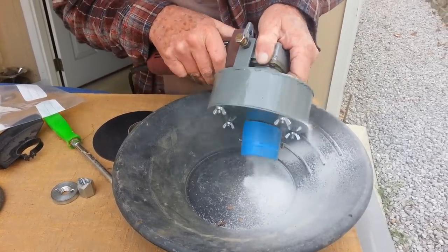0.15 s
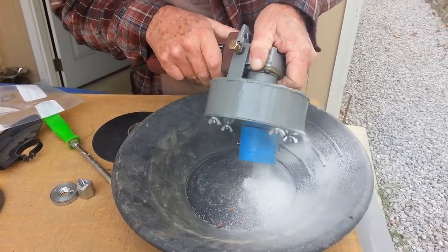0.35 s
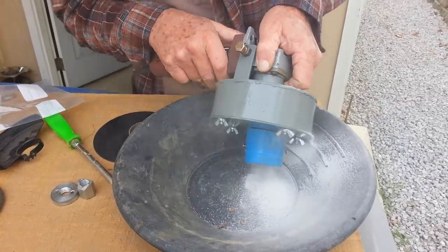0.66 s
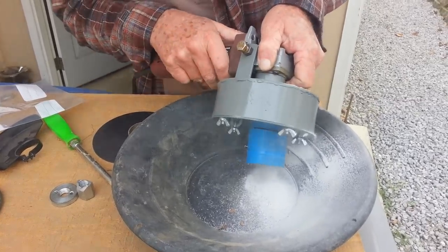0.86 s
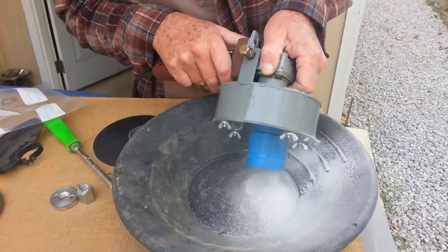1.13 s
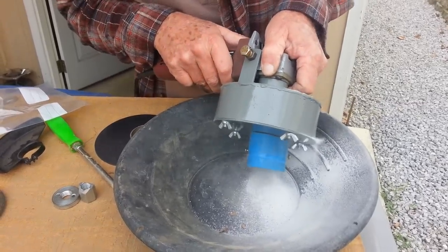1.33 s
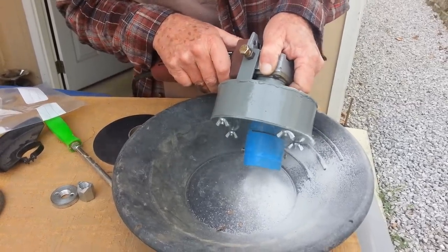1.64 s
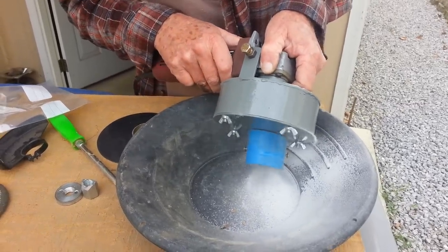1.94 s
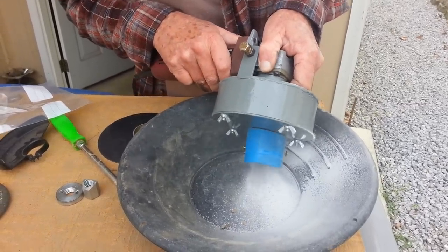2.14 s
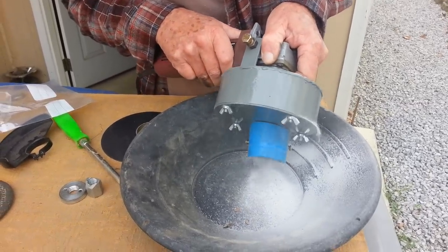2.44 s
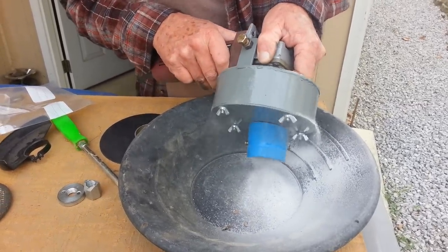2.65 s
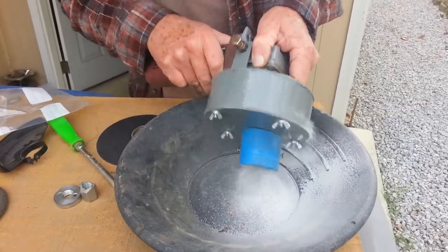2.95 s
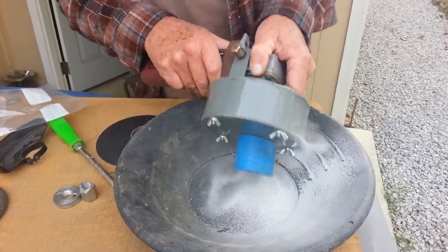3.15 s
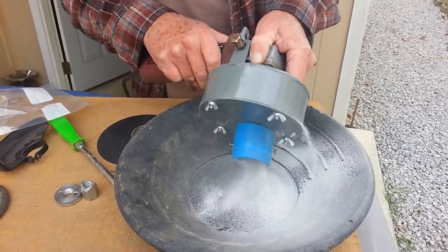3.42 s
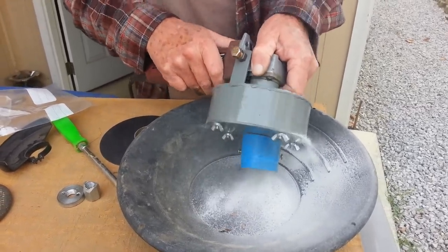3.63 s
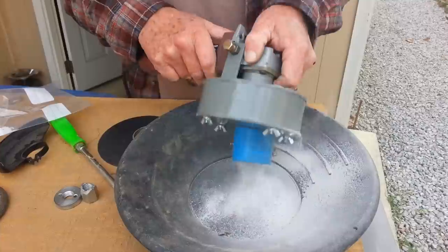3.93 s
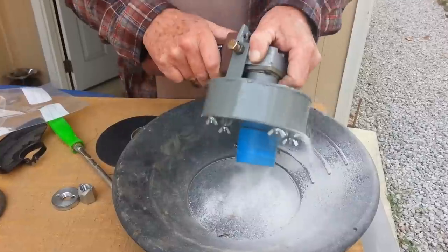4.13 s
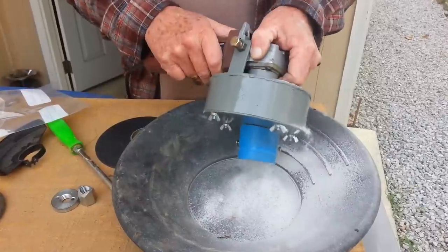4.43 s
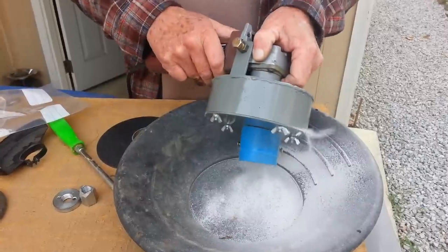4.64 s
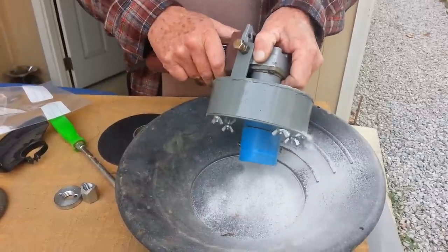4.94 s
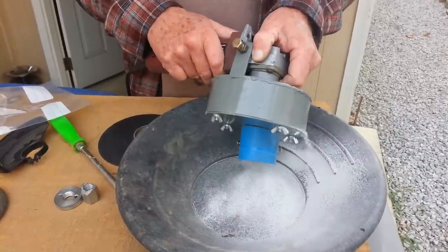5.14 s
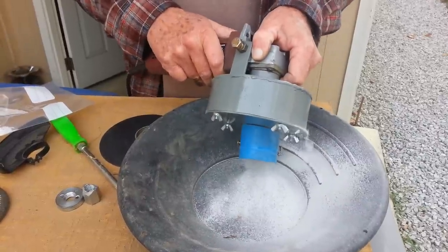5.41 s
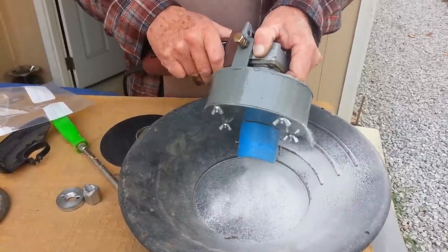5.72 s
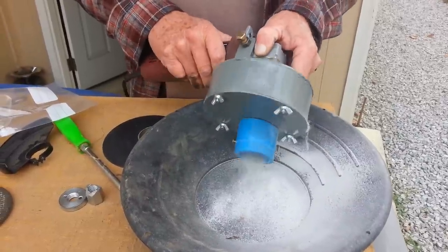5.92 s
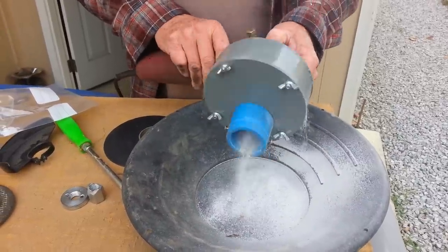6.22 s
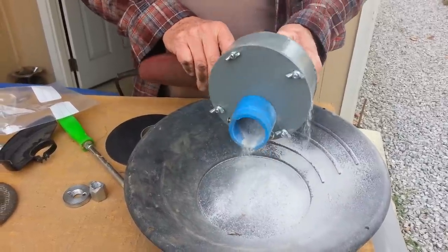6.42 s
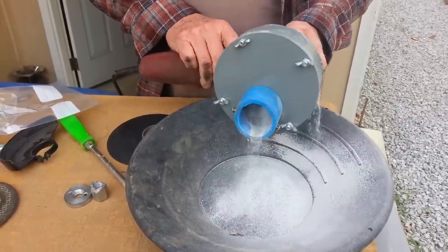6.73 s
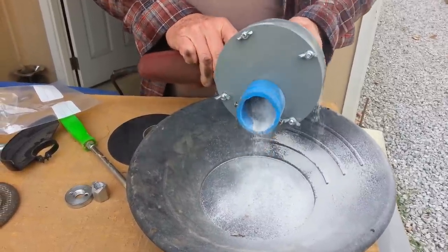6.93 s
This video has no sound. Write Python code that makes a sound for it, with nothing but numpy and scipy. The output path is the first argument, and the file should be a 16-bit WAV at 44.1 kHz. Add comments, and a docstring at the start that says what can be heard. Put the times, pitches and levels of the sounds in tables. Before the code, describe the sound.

A rock crusher drum roars close up, harsh steely grinding with rapid rattling fragments, sharp stone knocks and bright metallic pings, slightly overloaded.

```python
"""Stones smashed in a steel drum

An angle grinder whirls chains inside a closed steel drum, close to a camera, and smashes the stones in it.
Volleys of fragments, about 59 a second, shape noise filtered by the wall; bigger stones ring decaying modes.
Resonant noise howls in the spout, and low noise buffets the right microphone port; one jammed rock
shatters in a short roar. The camera's overloaded input rounds off the peaks."""
import sys
import numpy as np
from scipy import signal
from scipy.fft import rfft, irfft, next_fast_len
from scipy.io import wavfile
from scipy.ndimage import uniform_filter1d, map_coordinates

SR = 44100
rng = np.random.default_rng(int(sys.argv[2]) if len(sys.argv) > 2 else 0)


def makeup_ratio(level_db):
    """Linear amplitude ratio for a level in decibels (20 dB per factor of ten)."""
    decades = np.asarray(level_db, float) / 20
    return 10 ** decades


def bounce(signal):
    """Save signal as a 16-bit WAV file at the path given by the first command-line argument."""
    frames = np.transpose(np.atleast_2d(signal))
    limited = np.clip(frames, -1, 1)
    pcm = np.round(limited * 32767).astype(np.int16)
    wavfile.write(sys.argv[1], SR, pcm)


N = 311787


def unit(x):
    """Scaled to rms 1."""
    return x / np.sqrt(np.mean(x ** 2) + 1e-20)


def along(points, hz):
    """Interpolates (Hz, value) points on a log frequency axis."""
    f, v = np.transpose(points)
    return np.interp(np.log(hz + 1), np.log(f + 1), v)


def wobble(knots_per_s):
    """A smooth random curve through normal knots."""
    knots = rng.standard_normal(int(N * knots_per_s / SR) + 4)
    return map_coordinates(knots, [np.arange(N) * knots_per_s / SR])


def filtered(x, response):
    """x times a response of frequency."""
    m = next_fast_len(N + 8192)
    return irfft(rfft(x, m) * response(np.fft.rfftfreq(m, 1 / SR)), m)[..., :N]


def spikes(at_s, size):
    """Impulses of the given sizes at the given times."""
    return np.bincount(np.abs(at_s * SR).astype(int), size, N)[:N]


def resonance(hz, width_hz):
    """Response of one damped mode, 1 at its peak."""
    return lambda f: 1j * f * width_hz / (hz * hz - f * f + 1j * f * width_hz)


def pair(patchy_db):
    """Two partly alike noises for the two ports, with random gain patches in time and pitch."""
    # The two paths from drum to ports. Each row: frequency in Hz, likeness 0-1, right lead in rad.
    paths = [(200, 0.42, -0.5), (430, 0.59, 0), (790, 0.16, 0.45), (1340, 0.54, -0.5), (1700, 0.11, 0.2),
             (2130, 0.47, 0.54), (2800, 0.2, 0.3), (2840, 0.22, -3), (3580, 0.27, -1), (3940, 0.37, -4.5),
             (4360, 0.37, -2.5), (4700, 0, -11), (5250, 0.53, -5.5), (6000, 0.3, -8), (7200, 0.12, -9),
             (8200, 0.06, -10.5)]
    spectra = signal.stft(rng.standard_normal((2, N)), nperseg=256)[2]
    patches = rng.standard_normal(spectra.shape[1:])
    patches = uniform_filter1d(uniform_filter1d(patches, size=5, axis=0), size=4, axis=1)
    left, other = signal.istft(spectra * makeup_ratio(patchy_db * unit(patches)), nperseg=256)[1][:, :N]
    f, like, lead_rad = np.transpose(paths)
    shared = lambda hz: np.interp(hz, f, like)
    common = filtered(left, lambda hz: shared(hz) * np.exp(1j * np.interp(hz, f, lead_rad)))
    return np.array([left, common + filtered(other, lambda hz: np.sqrt(1 - shared(hz) ** 2))])


def ring(blows, modes, rattle_t60_s):
    """Each blow becomes a decaying noise burst that sets a group of damped sine modes ringing."""
    t = np.arange(SR // 8) / SR
    tone = sum(makeup_ratio(db - 60 * t / t60_s) * np.sin(2 * np.pi * hz * t) for hz, db, t60_s in modes)
    fade = makeup_ratio(-60 * t / rattle_t60_s)
    rattle = signal.fftconvolve(blows, fade / np.linalg.norm(fade))[:N] * rng.standard_normal(N)
    return signal.fftconvolve(rattle, tone)[:N]


def wind():
    """Lumpy low-frequency buffeting, nearly all on the exposed right port."""
    # Breeze spectrum. Each row: frequency in Hz, relative density in dB.
    breeze = [(20, -21), (45, 1), (100, 5), (200, 4), (400, -7.5), (900, -25)]
    # Gust course. Each row: time in seconds, relative level in dB.
    gusts = [(0, -27), (.08, -44), (.21, -33.5), (.37, -33), (.43, -55), (.5, -34.5), (1.71, -31),
             (1.81, -37), (2.42, -29.5), (2.89, -39.5), (3.11, -32), (3.21, -42), (3.3, -38), (3.37, -53),
             (3.43, -38.5), (4.35, -38), (4.43, -27), (4.5, -37.5), (5.14, -39), (5.7, -36), (7.07, -33)]
    rumble = filtered(rng.standard_normal((2, N)), lambda hz: makeup_ratio(along(breeze, hz)))
    lumpy = unit(rumble * makeup_ratio(1.75 * wobble(35)))
    quick_lulls_db = 5 * np.clip(wobble(14), 0, 3) ** 1.7
    gust_db = np.interp(np.arange(N) / SR, *np.transpose(gusts)) - quick_lulls_db
    return lumpy * makeup_ratio(gust_db + [[-17.74], [8.06]])


def spout(howl_db):
    """Air driven through drum and spout sings at their cavity resonance: noise through it twice."""
    cavity = resonance(hz=432, width_hz=75)
    air = unit(filtered(rng.standard_normal(N), lambda f: cavity(f) ** 2))
    return air * makeup_ratio(howl_db + 1.56 * wobble(8)) * makeup_ratio([[1.5], [-1.5]])


def jam():
    """A rock jams and shatters: a short noise roar, and the gain dip of the pause behind it."""
    # Shatter spectrum. Each row: frequency in Hz, relative density in dB.
    shatter = [(150, -23), (400, -1), (900, -8), (2000, -5), (4500, 0), (8000, -2.5), (12000, -10),
               (15000, -21)]
    at_s, before_fades_db, length_s = 1.611, 3, .027
    pause_s, pause_db = .018, -8
    t = np.arange(N) / SR - at_s
    attack, decay = np.clip(t / .0015, 0, 1), makeup_ratio(-250 * np.abs(t))
    release = np.clip((length_s - t) / .014 + .5, 0, 1)
    noise = unit(filtered(pair(patchy_db=2.0), lambda hz: makeup_ratio(along(shatter, hz))))
    hush = makeup_ratio(pause_db * np.exp(-((t - length_s - pause_s / 2) / pause_s * 2) ** 2))
    return makeup_ratio(before_fades_db) * attack * decay * release * noise, hush


def stones():
    """The biggest stones struck and a random scatter of smaller ones, in the same columns."""
    # Each row: time in seconds, then spray, low knock, wall ping and prior lull (or surge) in relative dB.
    biggest = [(0.3341, -11, -21, -6, -7), (0.3574, -12, -10, -5, -3), (0.5264, -12, -8.5, -17.5, 1),
               (0.5444, -20, -13, -27, -2), (1.1174, -13.5, -10, -16, -4), (1.8994, -17, -20, -13, -4),
               (1.9829, -13, -15, -12, -4), (2.1234, -10, -14, -15, -6), (2.6524, -6, -18, -11, -2),
               (3.045, -11, -13, -22, -1), (3.0574, -18, -5, -28, -4), (3.1094, -15, -9.5, -19, 1),
               (3.5774, -13, -18, -5, 0), (3.7434, -9, -9, -16, 0), (3.894, -9.5, -10, -12, -5),
               (3.9634, -9, -10.5, -20, -1), (4.2009, -10, -13, -8, -4), (4.5404, -10.5, -9, -14, -1),
               (4.5994, -15, -15, -19, -9), (5.0654, -7, -6, -19, -5), (5.1517, -12, -16, -19, -17),
               (5.1986, -11, -16, -16, -7), (5.2694, -17, -9, -15, 1), (5.3063, -8, -16, -9, -6),
               (5.444, -9, -10, -3, 0), (5.7518, -19, -18, -1, -7), (5.8624, -19, -27, -7, 0),
               (5.953, -18, -25, -12, 1), (5.9883, -19, -29, -2.5, -1), (6.088, -18, -29, -8, 0),
               (6.134, -21, -33, -24, -9), (6.3021, -18, -26, -5.5, -2), (6.3494, -18, -27, -11, -2),
               (6.4373, -21, -29, -14, -7), (6.455, -24, -28, -7, 2), (6.6424, -15, -29, -5, -1),
               (6.7087, -11, -13, -5, -9), (6.9944, -12, -12, -20, -4)]
    pebbles_per_s = 3
    pebble_db, spread_db = (-23, -25.5, -23, -1.5), (2.1, 4.8, 3, 1.2)  # spray, knock, ping, lull
    draw = rng.standard_normal((round(pebbles_per_s * N / SR), 4))
    at_s = rng.uniform(.03, N / SR - .03, len(draw))
    return np.vstack([biggest, np.c_[at_s, pebble_db + draw * spread_db]])


def volleys(per_s, scatter, fall_30db_s):
    """Times of the fragment volleys, and the power curve they leave: a quick rise and decay for each."""
    count = int(N / SR * per_s) + 40
    at_s = np.cumsum(1 + scatter * rng.standard_normal(count)) / per_s
    t = np.arange(SR // 8) / SR
    shape = makeup_ratio(-60 * t / fall_30db_s) * (1 - np.exp(-t / 0.00035))  # of power
    return at_s, np.abs(signal.fftconvolve(spikes(at_s, np.ones(count)), shape)[:N])


def singing(pelting):
    """The pelting filtered by each wall mode; each drifts, swells or sags once and changes as the drum tips."""
    # Wall modes kept singing by the grit. Each row: frequency and width in Hz, left and right relative dB.
    wall = [(4240, 230, -18.5, -35), (4680, 130, -16.5, -27), (6650, 160, -17, -21), (7750, 380, -36, -12),
            (8720, 360, -32, -16), (9280, 390, -18, -18)]
    # Each mode's course. Each row: drift in dB per s, swell time and length in s, swell in dB, tipped change in dB.
    swell = [(-3, 4.1, .6, 10, 1.5), (0, 6.2, 0.82, 7, -11), (0.8, 6, 1.2, -14, 8),
             (1.5, 6.2, .7, -7, -1.5), (-0.7, 6.3, .5, 5, -3), (1.5, 2.1, .8, 7.5, -2.5)]
    tip_from_s, tip_s = 6.24, .6  # the drum is tipped up to face the camera
    t = np.arange(N) / SR
    tipped = np.clip((t - tip_from_s) / tip_s, 0, 1)
    out = 0
    for (hz, width_hz, *side_db), (drift, at_s, length_s, swell_db, tip_db) in zip(wall, swell):
        mode = unit(filtered(pelting, resonance(hz, width_hz)))
        swelling_db = swell_db * np.exp(-((t - at_s) / length_s) ** 2)
        slow_db = drift * (t - t.mean()) + swelling_db + tip_db * tipped
        swing_db = slow_db + 3 * wobble(30) - 3.5  # each mode flutters on its own
        out = out + mode * makeup_ratio(swing_db + np.array(side_db)[:, None])
    return out


def drum(work_db):
    """Fragments pelt the wall in volleys over a steady churn; stones spray a shower and ring the steel."""
    # Pelted steel as each port hears it. Each row: frequency in Hz, relative density in dB.
    left = [(120, -44), (300, -8.5), (600, -13.5), (900, -15), (1400, -11.5), (2100, -11.5), (2800, -11.5),
            (3300, -6.5), (4200, -2.5), (5500, -7), (6600, -5.5), (7500, -6.5), (8400, -17), (9500, -8.5),
            (11200, -12), (12400, -12), (13500, -11), (14300, -22.5)]
    right = [(120, -35), (300, -8.5), (600, -11.5), (900, -14.5), (1500, -10.5), (2600, -8), (4000, -8.5),
             (5600, -7.5), (6800, -5.5), (7700, -2), (8300, -5.5), (9300, -4.5), (10200, -9), (11000, -9.5),
             (12000, -7), (13500, -12.5), (14300, -23.5)]
    # Lid modes, then wall modes. Each row: frequency in Hz, relative level in dB, t60 in seconds.
    knock_modes = [(1320, -14.5, 0.0069), (1614, -6.5, 0.01), (2106, -1.5, 0.021), (2430, -5.5, 0.0089),
                   (3260, -6.5, 0.013)]
    ping_modes = [(4710, -1, 0.035), (4280, -11, 0.017), (7200, -16, .025), (8950, -7, .015)]
    volley_s, power = volleys(per_s=59, scatter=.3, fall_30db_s=0.076)
    supply = uniform_filter1d(power, size=2600)  # crowded volleys share the fragments
    busy = np.sqrt(0.21 + power / supply * 0.79) * makeup_ratio(work_db + 0.5 * wobble(14))

    t = np.arange(SR // 8) / SR
    before = np.hanning(round(0.011 * SR))
    struck = stones()
    for at_s, spray_db, _, _, lull_db in struck:
        i = round(at_s * SR)
        busy[i - len(before) + len(before) // 4:][:len(before)] *= makeup_ratio(lull_db * before)
        spray = (makeup_ratio(spray_db - 60 * t / 0.044) * (1 - np.exp(-t / 0.00095)))[:N - i]
        busy[i:][:len(t)] = np.hypot(busy[i:][:len(t)], spray)

    grit = makeup_ratio(2.6 * uniform_filter1d(rng.standard_normal(N), size=9))  # single chips stand out a little
    pelting = pair(patchy_db=1.5) * busy * grit
    colour = lambda hz: makeup_ratio(np.array([along(left, hz), along(right, hz)]))
    steel = unit(filtered(pelting, colour)) + singing(pelting)
    steel = steel * np.sqrt(np.mean(pelting ** 2)) * makeup_ratio(-1.25)

    at_s, _, knock_db, ping_db, _ = struck.T
    chance = rng.standard_normal((len(volley_s), 2))  # each volley rings the steel by chance
    knocks = spikes(at_s, makeup_ratio(knock_db)) + makeup_ratio(-27.5) * spikes(volley_s, chance[:, 0])
    pings = spikes(at_s, makeup_ratio(ping_db)) + makeup_ratio(-24) * spikes(volley_s, chance[:, 1])
    knock = ring(knocks, knock_modes, rattle_t60_s=0.055) * makeup_ratio([[.6], [-.6]])
    ping = ring(pings, ping_modes, rattle_t60_s=0.021) * makeup_ratio([[2.5], [-2.5]])
    return steel + knock + ping


def scene():
    """Drum, spout, shattering rock and wind at the two ports."""
    # Grinding course. Each row: time in seconds, relative level in dB.
    work = [(0, -8), (.1, -10), (1.6, -10), (3, -10.5), (4.9, -10.5), (5.05, -10.5), (5.87, -10.5),
            (6.5, -11), (7.07, -11)]
    # Spout howl course. Each row: time in seconds, relative level in dB.
    howl = [(0, -28.5), (.27, -37), (.33, -26.5), (.61, -41), (.87, -31), (1.04, -37), (1.6, -32.5),
            (1.8, -36), (2.83, -35.5), (2.91, -28), (3.09, -34.5), (4.4, -31), (5.26, -32), (5.95, -32),
            (6.04, -50), (6.1, -31.5), (6.32, -39), (6.48, -29.5), (7.07, -32)]
    work_db, howl_db = [np.interp(np.arange(N) / SR, *np.transpose(rows)) for rows in (work, howl)]
    roar, hush = jam()
    return (drum(work_db) + spout(howl_db)) * hush + roar + wind()


def roll_off(x):
    """The treble ends steeply here."""
    return signal.sosfilt(signal.butter(12, 14550, fs=SR, output="sos"), x)


def record(dry):
    """The left port has a narrow dip at one pitch; the overloaded input rounds off the peaks."""
    dip_hz, width_hz, depth_db = 2760, 450, -7
    mode = resonance(dip_hz, width_hz)
    dip = lambda f: 1 - (1 - makeup_ratio(depth_db)) * mode(f)
    ports = np.array([filtered(dry[0], dip), dry[1]])
    rounded = ports / (1 + np.abs(ports / 0.79) ** 4) ** (1 / 4)  # ceiling 0.79 of full scale
    return roll_off(rounded)


dry = scene()
out = record(dry)
bounce(out)
```